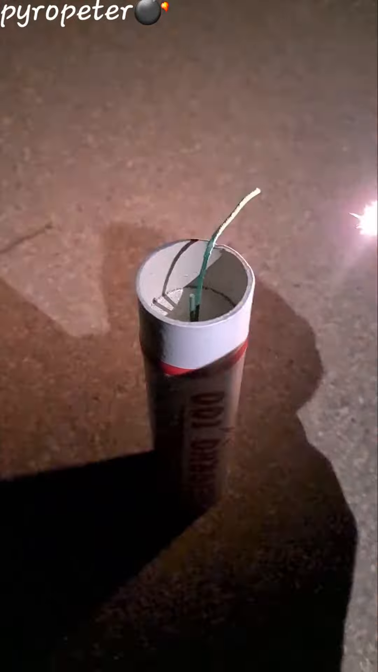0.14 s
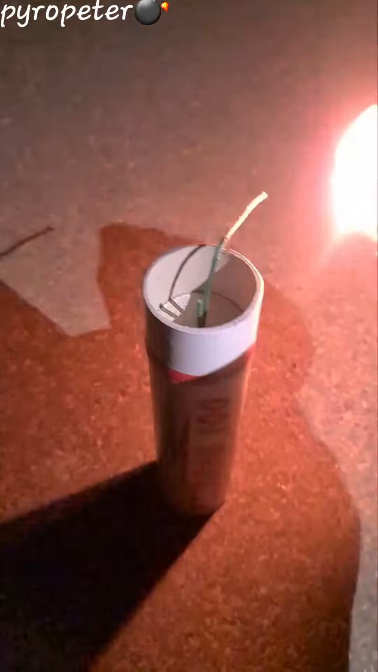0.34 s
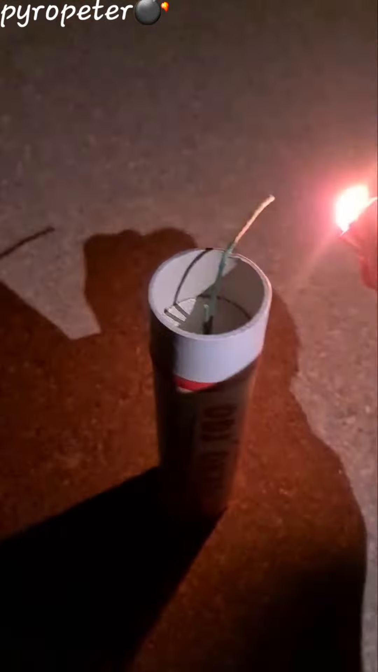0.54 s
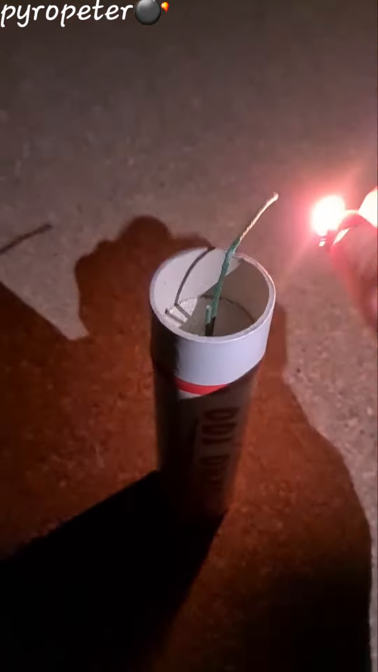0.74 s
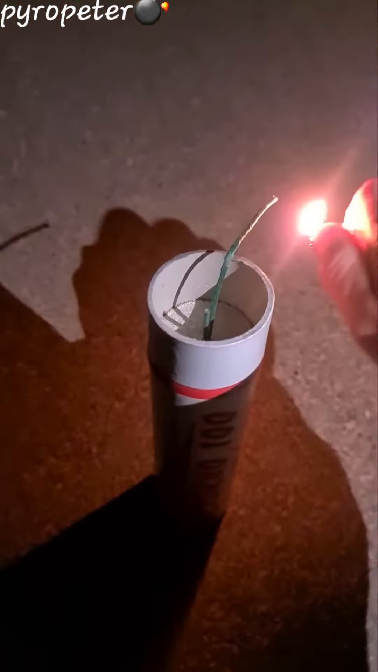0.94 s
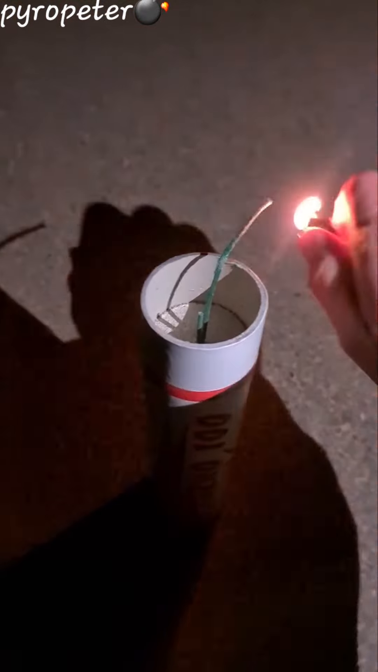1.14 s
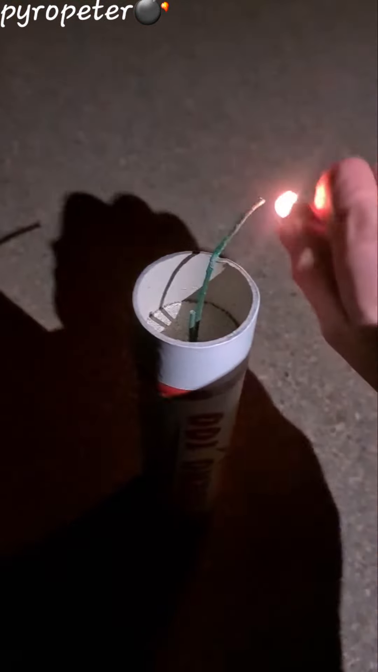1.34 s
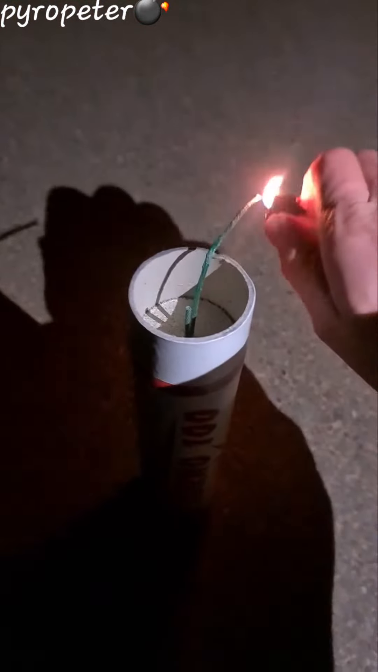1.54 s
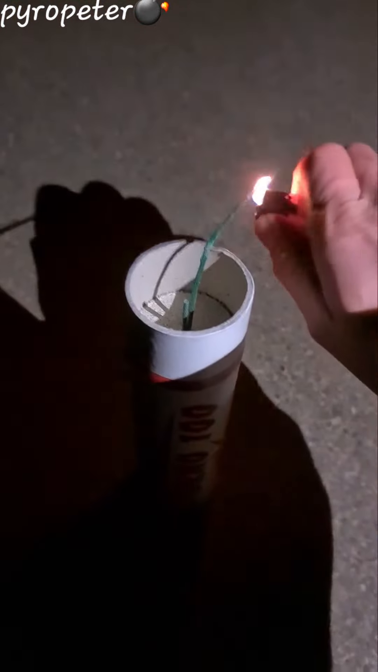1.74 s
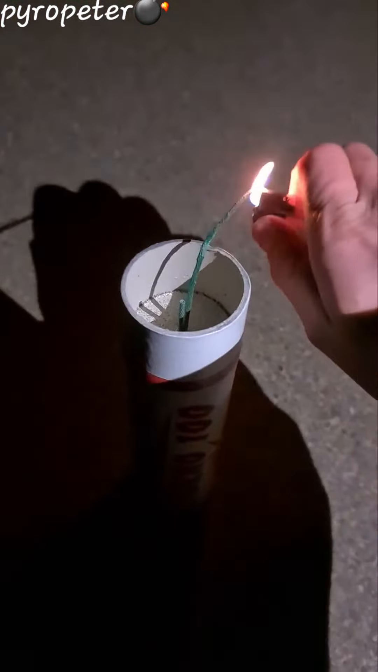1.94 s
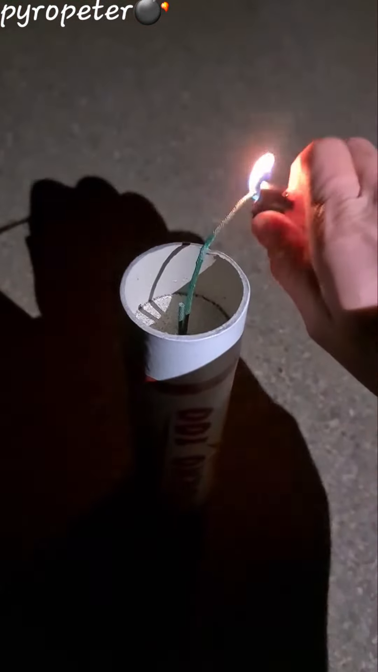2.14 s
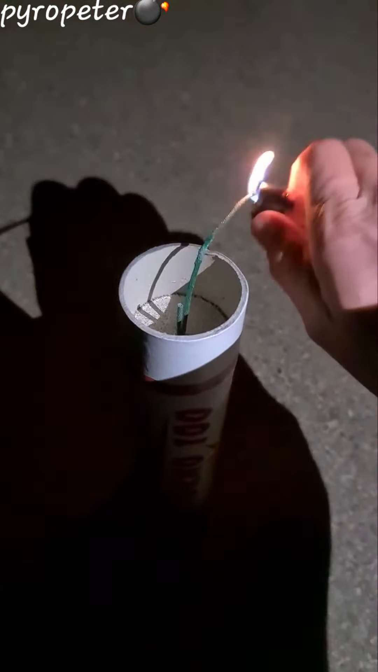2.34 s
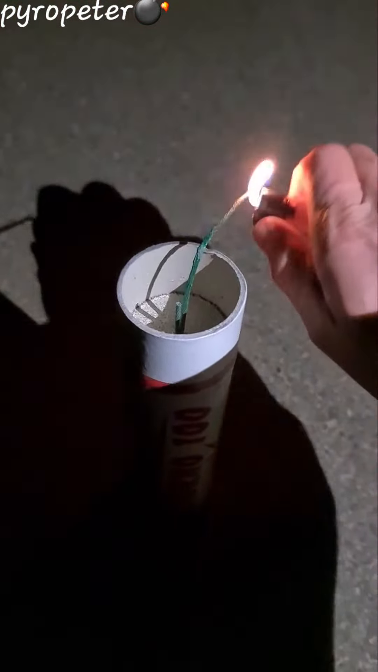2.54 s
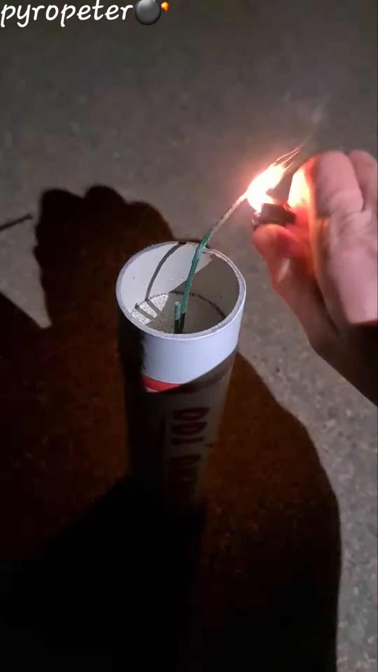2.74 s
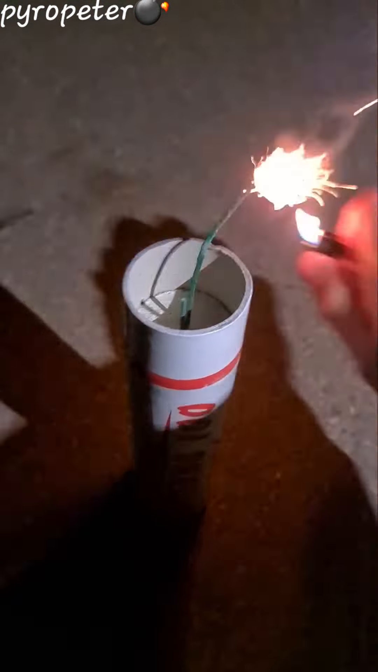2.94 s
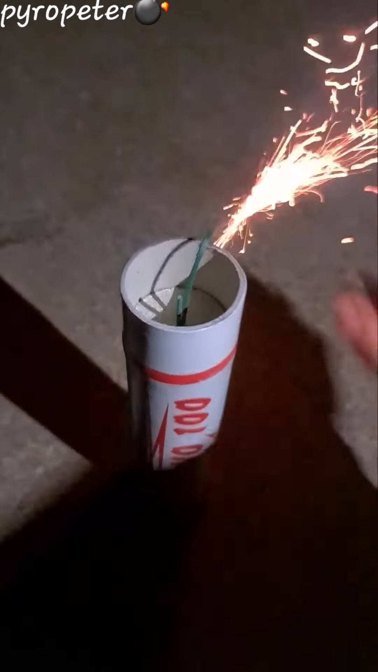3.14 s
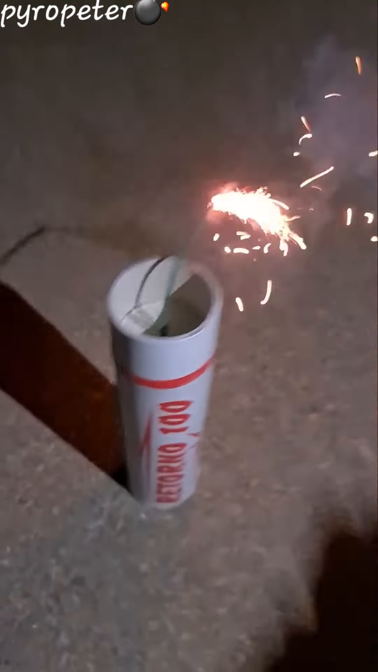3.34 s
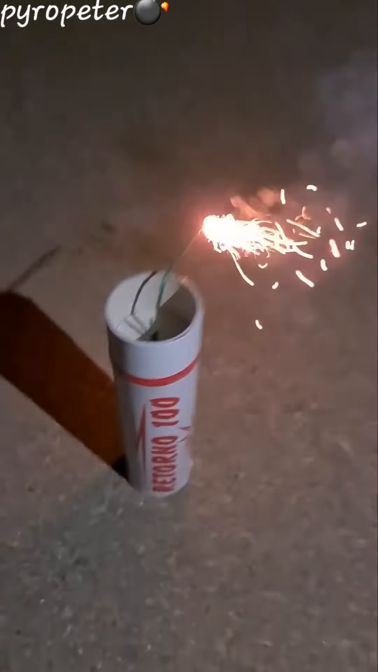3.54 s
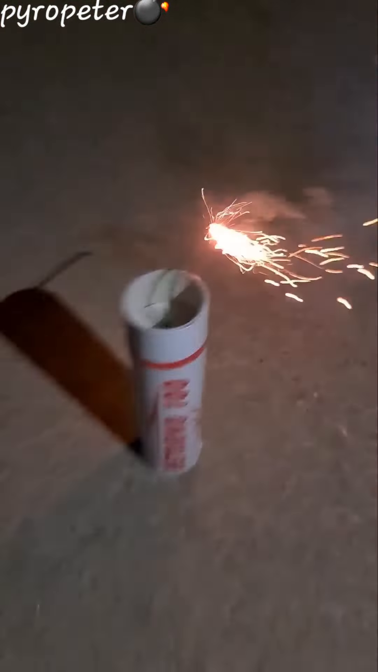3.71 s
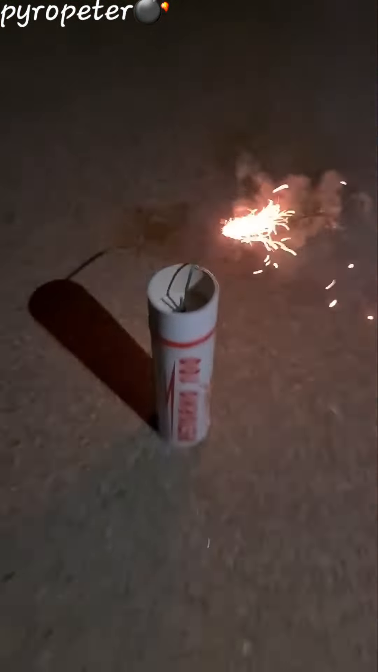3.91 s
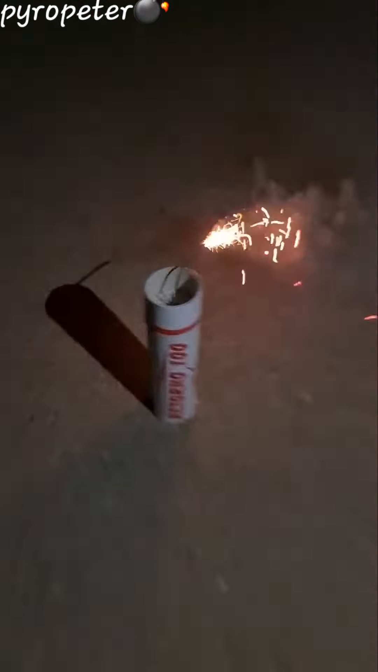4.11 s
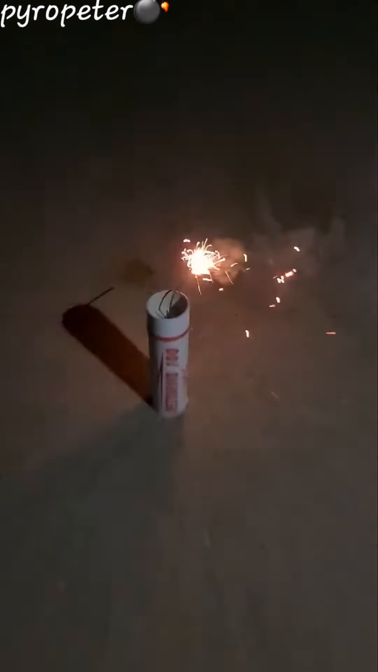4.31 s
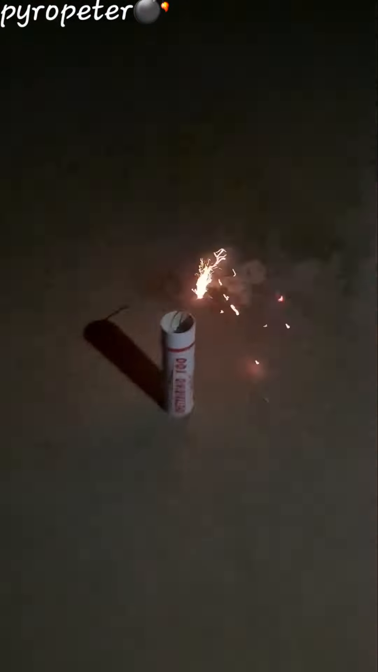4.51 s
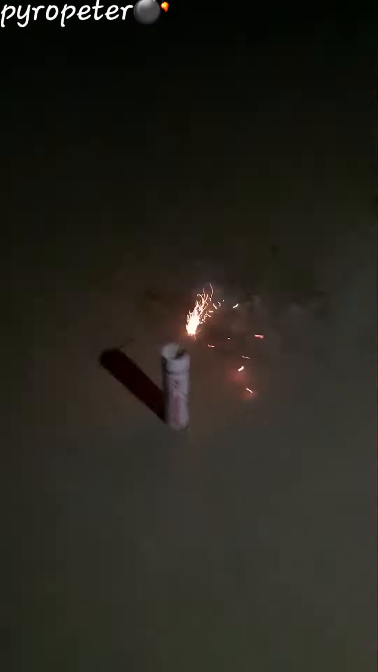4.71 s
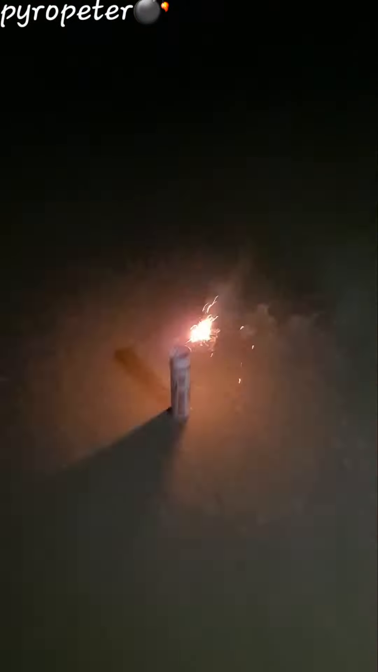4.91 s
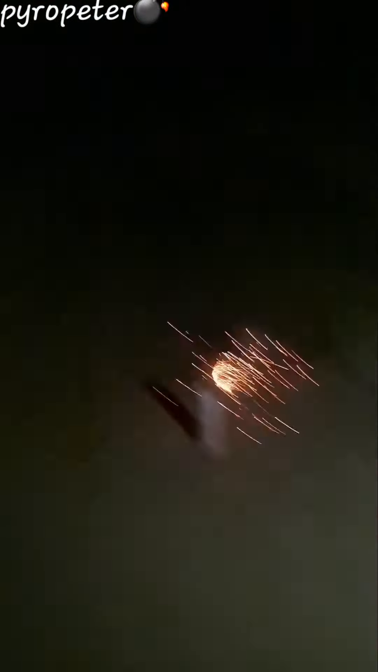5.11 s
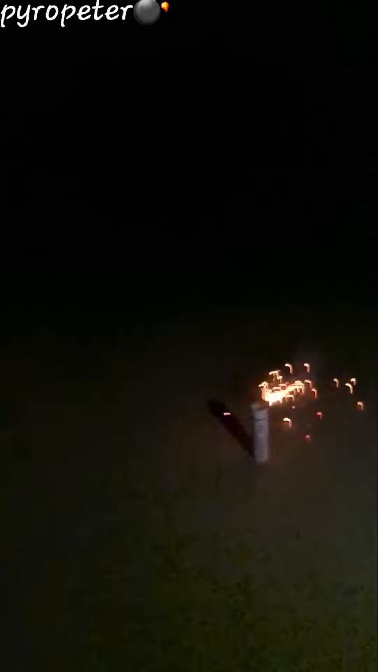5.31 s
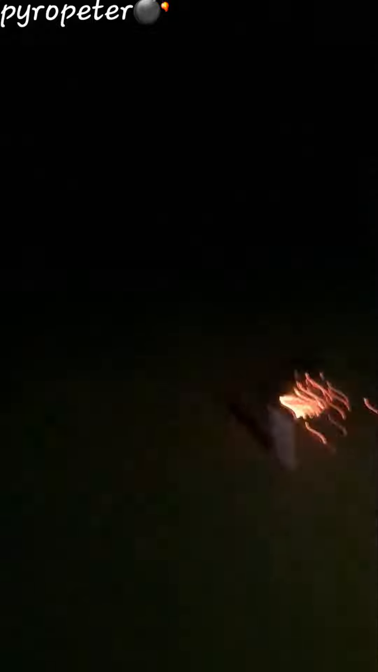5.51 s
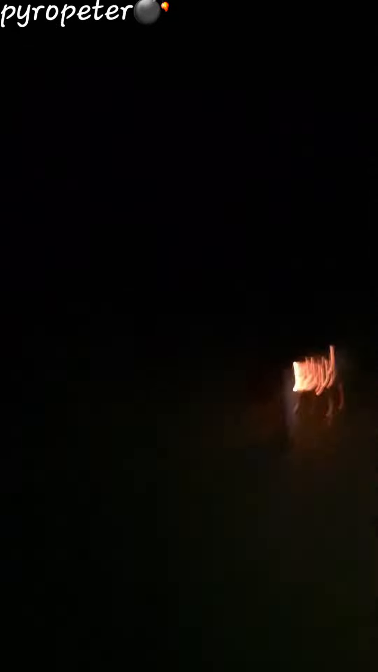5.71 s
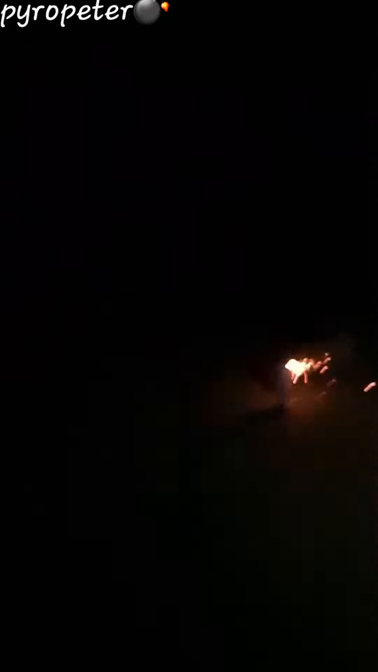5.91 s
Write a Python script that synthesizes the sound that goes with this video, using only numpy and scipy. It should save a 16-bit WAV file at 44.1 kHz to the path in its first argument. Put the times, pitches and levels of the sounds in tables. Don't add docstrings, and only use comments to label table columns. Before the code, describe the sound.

A lighter clicks and rasps in the quiet night, then a fuse spits, catches and burns with a harsh crackling hiss amid handling knocks.

```python
import sys
import numpy as np
from scipy import signal
from scipy.fft import rfft, irfft
from scipy.io import wavfile
from scipy.ndimage import uniform_filter1d, map_coordinates

SR = 44100
rng = np.random.default_rng(int(sys.argv[2]) if len(sys.argv) > 2 else 0)


def put_to_file(sound):
    columns = np.atleast_2d(sound).T
    safe = np.clip(columns, -1, 1)
    whole_steps = np.round(safe * 32767)
    wavfile.write(sys.argv[1], SR, whole_steps.astype(np.int16))


def gain_from_db(level_db):
    decades = np.asarray(level_db, float) / 20
    return 10 ** decades


N = 262953

# time_s, edge_hz
GAP = [(0, 9760), (1, 10200), (2, 10860), (3, 11560), (4, 12370), (5, 12830), (5.96, 13150)]


def rms_one(x):
    return x / np.sqrt(np.mean(x ** 2) + 1e-20)


def in_time(rows):
    s, *columns = np.transpose(rows)
    return [np.interp(np.arange(N) / SR, s, c) for c in columns]


def drift(rate_hz):
    r = np.exp(-80 * np.pi * rate_hz / SR)
    slow = signal.lfilter([1], [1, -2 * r, r * r], rng.standard_normal(N // 40 + 2002))[2000:]
    return np.interp(np.arange(N) / 40, np.arange(len(slow)), rms_one(slow))


def coloured(spectrum):
    hz, db = np.transpose(spectrum)
    bins_hz = np.arange(1, N // 2 + 2) * SR / N
    gain = gain_from_db(np.interp(np.log(bins_hz), np.log(hz), db))
    return rms_one(irfft(rfft(rng.standard_normal(N)) * gain, N))


def band(x, hz, octaves):
    edges = np.clip(hz * 2 ** (np.array([-.5, .5]) * octaves), 20, .45 * SR)
    return signal.sosfilt(signal.butter(2, edges, "band", fs=SR, output="sos"), x)


def add(out, s, sound):
    at = max(round(s * SR), 0)
    out[at:at + len(sound)] += sound[:N - at]


def resonances(drive, modes, flutter_db, rate, order=1, bend=1):
    out = 0
    for k, (hz, width, db) in enumerate(modes):
        r = np.exp(-np.pi * width / SR)
        section = [(1 - r * r) / 2, 0, (r * r - 1) / 2, 1, -2 * r * np.cos(2 * np.pi * hz / SR), r * r]
        swell = gain_from_db(db + flutter_db * (drift(rate) + 0.2 * drift(2)))
        out = out + (-1) ** k * swell * signal.sosfilt([section, section], drive)
    edge_hz, = in_time(GAP)
    speed = edge_hz / edge_hz[-1]
    return rms_one(map_coordinates(out, [np.cumsum(bend * speed)], order=order))


def fuse():
    # pitch_hz at full speed, width_hz, level_db
    roar_modes = [(602, 230, -7), (787, 300, -2.5), (900, 303, -3), (1075, 420, -10.5), (420, 265, -17.5),
                  (1425, 300, -16)]
    throat_modes = [(1790, 124, 1.5), (1976, 160, 3), (2200, 250, 1), (2380, 160, 0), (2707, 140, 2.5)]
    jet_modes = [(2800, 380, 2.5), (3375, 530, -2.5), (4900, 180, -10), (5370, 190, -2.5), (6040, 360, -6),
                 (7200, 340, -34)]
    whine_modes = [(4115, 420, 0)]
    spray_modes = [(8150, 4500, -8), (8500, 240, 7), (9150, 3750, 3), (10480, 690, -0.5),
                   (10530, 1700, 1.5), (11230, 3900, -2), (12490, 450, 6), (16350, 1500, -1.5)]
    # time_s, share (0-1)
    blurring = [(2.84, 0.4), (3.1, 0.57), (3.25, 0.5), (3.32, 0.7), (3.52, 0.6), (3.62, 0.8), (3.95, 0.8),
                (4.05, 0.2), (4.35, 0.48), (4.55, 0.86), (4.68, 0.87), (4.85, 0.8), (5.1, 1), (5.96, 1)]
    # time_s, level_db over the vigour
    whining = [(2.9, -3), (3.0, -5), (3.14, -5), (3.26, -18), (3.33, -8), (3.42, -4.5), (3.47, -10),
               (3.54, -8), (3.64, -13), (3.85, -14), (4.0, -6), (4.12, -12.5), (4.23, -7), (4.4, -3.5),
               (4.53, -9.5), (4.66, -28), (4.76, -9), (4.85, -24), (5.96, -13)]
    # time_s, pitch_ratio
    narrowing = [(0, 1.025), (3.3, 1.01), (3.9, 1.01), (4.25, 1.01), (4.55, 1.055), (4.85, 1.06),
                 (5.96, 1.06)]

    vigour, choke_db, aim_db, flame_db = burning()
    jet_db = -1.5 + 0.33 * choke_db + aim_db
    throat_db = -14 + choke_db
    roar_db = 0.53 * choke_db + flame_db

    grain_size = gain_from_db(4.8 * np.minimum(rng.exponential(1, N), 3.6))
    grains = (rng.random(N) < 900 / SR) * grain_size * rng.choice([-1, 1], N)
    turbulence = gain_from_db(0.28 * drift(33) + 0.34 * drift(220))
    gas = (rng.standard_normal(N) + 0.2 * rms_one(grains)) * turbulence

    roar = gain_from_db(roar_db) * resonances(gas, roar_modes, flutter_db=2.6, rate=24)
    throat = gain_from_db(throat_db) * resonances(gas, throat_modes, flutter_db=2.2, rate=20)

    blur = np.clip(in_time(blurring)[0], 0, 1)
    wash = rms_one(band(gas[::-1], 2420, 1.81)) * gain_from_db(0.29 * drift(51))
    clear_jet = resonances(gas, jet_modes, flutter_db=2.2, rate=16, order=3)
    jet = gain_from_db(jet_db + 1.05) * (np.sqrt(1 - blur) * clear_jet + np.sqrt(blur) * wash)
    whine = resonances(gas, whine_modes, flutter_db=1.5, rate=20, order=3, bend=in_time(narrowing)[0])
    jet = jet + gain_from_db(in_time(whining)[0]) * whine
    spray = gain_from_db(-0.27) * resonances(gas, spray_modes, flutter_db=1.7, rate=17, order=3)

    lag = SR * (.00145 + 0.00013 * drift(1.78))
    echo = np.interp(np.arange(N) - lag, np.arange(N), spray + jet)
    heard = roar + throat + 0.73 * (jet + spray + 0.37 * echo)
    close = np.clip((3.8 - np.arange(N) / SR) / .3, 0, 1)
    return vigour * (heard - .85 * close * band(heard, 1380, .34))


def burning():
    # time_s, vigour_db, choke_db by the sheath, aim_db of the jet at the microphone
    burn = [(3.115, -46.5, 5, -1.5), (3.155, -43.5, 3.5, -4.5), (3.19, -35, -1.5, -4),
            (3.235, -34.5, -2, -13), (3.275, -35, 5.5, -5), (3.315, -29.5, 2.5, -6), (3.36, -32.5, 2.5, -5),
            (3.6, -35, -0.5, -5), (3.7, -36, 3.5, -4), (3.88, -34.5, 0, -2.5), (4.08, -36.5, -1, -7.5),
            (4.28, -36, -3, -0.5), (4.55, -37.5, -8, -2.5), (4.95, -41.5, -1.5, 0),
            (5.2, -41.5, -14.5, 2.5), (5.4, -43, 3.5, -3), (5.68, -45, -1, -2), (5.96, -44.5, -15, 6.5)]
    # start_s, length_s, level_db, choke_db
    spurts = [
        (2.89, 0.027, -66, -2),
        (2.908, 0.097, -50, 3.5),
        (2.986, 0.021, -55, 4),
        (3.017, 0.0096, -54, -14),
        (3.037, 0.02, -55, 9),
        (3.088, 0.018, -55.5, -7),
    ]
    # time_s, level_db
    flame_size = [(2.9, -12), (3.15, -16), (3.24, -10.5), (3.33, -11.5), (3.5, -10), (3.7, -9), (3.9, -4),
                  (4.0, -6), (4.2, -4), (4.37, -2), (4.5, -2), (4.58, -3.5), (4.66, -0.5), (4.8, -1.5),
                  (4.95, -5), (5.2, -3.5), (5.5, -5.5), (5.96, -11)]
    rise_s, fall_s = .003, .004

    t = np.arange(N) / SR
    vigour_db, choke_db, aim_db = in_time(burn)
    choke_db = choke_db + 9 * np.exp(-np.maximum(t - 3.1, 0) / 0.97)
    vigour = gain_from_db(vigour_db) * np.exp(np.minimum(t - burn[0][0], 0) / rise_s)
    for s, length, db, extra_db in spurts:
        rise = np.minimum(t - s, 0) / rise_s
        fall = np.maximum(t - s - length, 0) / fall_s
        spurt = gain_from_db(db) * np.exp(rise - fall)
        choke_db = choke_db + extra_db * spurt / (spurt + vigour + 1e-9)
        vigour = vigour + spurt
    return vigour, choke_db, aim_db, in_time(flame_size)[0]


def bursts():
    # pitch_hz, width_octaves, level_db
    lighter = [(540, 1.1, -13), (1150, 0.32, -15), (1960, 0.6, -1.5), (2940, 0.24, -0.5), (4840, 0.2, -6),
               (5400, 1.2, -5.5), (6800, 0.29, -4), (8200, 0.13, -7.5), (12600, 1.1, -9)]
    spring = [(1770, 0.19, -10), (2670, 0.16, 0.5), (3100, 0.11, -18), (4500, 0.036, -10),
              (5200, 0.054, -15), (8080, .2, -8.5), (2200, 2, -2.5)]
    flame = [(1754, 0.087, 1.5), (2140, 0.034, -6), (2420, 0.048, -10), (3520, 0.12, -4), (4820, .15, -6),
             (7500, 0.28, 1.5), (9300, 0.098, 2.5), (9460, 0.03, -3)]
    sole = [(60, 3.9, -3), (760, 1.27, 2.5), (2670, 1.13, -1), (4700, 2, -1.5), (9340, 0.49, 2.5)]
    pebble = [(53.4, 2.5, -12), (433, 0.48, 1), (850, 0.56, 4), (1980, 1.5, -16), (5000, 3.5, -19.5)]
    # top_s, rms_db, rise_s, fall_s, brightness_db per octave
    wheel_strokes = [
        (.452, -56, 0.013, 0.019, -7),
        (.546, -44, .004, 0.0066, -1.5),
        (.557, -29.5, 0.0023, 0.009, 3),
        (.5665, -22, 0.0062, 0.0025, 1),
        (.5735, -28.5, 0.002, 0.0047, -0.5),
        (.585, -46.5, .006, 0.018, 3.5),
        (.665, -56.5, 0.002, 0.017, 4.5),
    ]
    spring_strokes = [(.494, -48, .01, 0.01, 0), (.504, -42.5, 0.0024, 0.02, 1),
                      (.516, -45, .004, .012, -2), (.529, -44, .005, 0.0074, 0)]
    flame_strokes = [
        (3.316, -33, 0.022, 0.032, 1),
        (3.38, -38.5, 0.017, 0.035, 1),
        (3.46, -44, .04, 0.083, -1.5),
    ]
    sole_strokes = [
        (5.262, -33, 0.0017, 0.0077, 0),
        (5.2665, -22, 0.001, 0.006, 0.83),
        (5.276, -27, 0.0073, 0.014, 0),
        (5.292, -31.5, 0.011, 0.027, 0.94),
    ]
    pebble_strokes = [
        (5.715, -32, 0.0027, 0.013, 0.5),
        (5.742, -24, 0.011, 0.011, 2.84),
        (5.769, -42, 0.0059, 0.004, 2),
        (5.921, -34.5, 0.0055, 0.01, 6.9),
    ]
    # top_s, rms_db, pitch_hz, length_s
    brushes = [(0.647, -42.5, 282, 0.0198), (1.096, -63, 1100, 0.1), (1.845, -61, 576, 0.045),
               (3.283, -42, 287, 0.13), (3.315, -28, 5000, 0.036), (5.08, -33.5, 44.6, 0.021),
               (5.293, -35, 43.7, 0.22), (5.432, -29, 315, 0.02), (5.436, -37.5, 2020, 0.019),
               (5.929, -35, 520, 0.059), (2.949, -57.5, 220, 0.032), (3.14, -63, 161, 0.03),
               (4.912, -40, 155, 0.036), (5.517, -39, 40, 0.026), (5.898, -40.5, 131, 0.069),
               (1.765, -70, 170, 0.025), (1.799, -66, 2800, 0.017), (3.183, -51, 118, .03),
               (3.901, -42.5, 890, 0.046), (5.738, -31, 44.5, 0.029)]
    spits = [(5.561, -37.5, 8500, 0.014), (5.835, -35, 9150, 0.02), (5.87, -40, 8600, .0074)]
    whistles = [(5.701, -43, 12450, 0.023), (5.81, -52, 12600, .02)]

    rows = []
    for strokes, body in ((wheel_strokes, lighter), (spring_strokes, spring),
                          (flame_strokes, flame), (sole_strokes, sole)):
        for s, db, rise, fall, tilt_db in strokes:
            for hz, octaves, part_db in body:
                rows.append((s, db + part_db + tilt_db * np.log2(hz / 3000), hz, octaves, rise, fall))
    for s, db, rise, fall, tilt_db in pebble_strokes:
        for hz, octaves, part_db in pebble:
            level_db = db + part_db + tilt_db * np.log2(hz / 900)
            rows.append((s, level_db, hz * 2 ** (tilt_db / 8), octaves, rise, fall))
    rows += [(s, db, hz, 2.05, length, length) for s, db, hz, length in brushes]
    rows += [(s, db, hz, 0.028, length, length) for s, db, hz, length in whistles]
    rows += [(s, db, hz, 0.56, 0.002, length) for s, db, hz, length in spits]

    out = np.zeros(N)
    for s, db, hz, octaves, rise, fall in rows:
        before, after = (4000, 8000) if max(rise, fall) > .02 else (2500, 4500)
        t = np.arange(-before, after) / SR
        hiss, lumps = rng.standard_normal((2, len(t)))
        grit = hiss * gain_from_db(1.4 * rms_one(uniform_filter1d(lumps, size=60)))
        shape = np.exp(np.where(t < 0, t / rise, -t / fall))
        rub = rms_one(band(band(grit, hz, octaves), hz, 4.4 * octaves))
        add(out, s + t[0], gain_from_db(db) * shape * rub)
    return out


def ticks():
    # time_s, peak_db, pitch_hz
    taps = [
        (.734, -40, 6860),
        (1.676, -39, 2010),
        (5.126, -18.5, 1560),
    ]
    snaps = [(.662, -26, 7000), (.7205, -26, 11000), (1.469, -45, 1620), (4.989, -20.5, 3500),
             (5.045, -26, 1940), (5.213, -22, 2960), (5.2655, -20, 6000), (5.6256, -16, 2200),
             (5.919, -30, 2800)]
    pops = [(2.8605, -45, 4080), (2.8672, -27, 4100), (2.893, -50, 2800), (3.022, -32, 4000),
            (3.0365, -28, 2800), (3.0769, -36, 2500), (3.1155, -49, 3500), (.369, -33, 10000),
            (1.1345, -38, 1800)]
    clicks = [(.518, -23, 3700), (.618, -28, 1900), (.662, -38, 3000), (.7215, -26, 8500),
              (.911, -41, 3400), (1.678, -44, 6500), (1.72, -47, 7500), (5.545, -25, 1300),
              (1.602, -32, 2240), (1.809, -30.5, 2170), (1.8215, -32.5, 2550), (1.908, -37.5, 2000),
              (4.173, -17, 2200), (5.4355, -23, 2550)]
    chinks = [(.3765, -38, 744), (.7215, -36, 3720), (.722, -31, 13400), (.505, -34, 8100),
              (2.044, -46, 3100), (2.046, -51, 1500), (5.57, -28, 4200), (5.575, -31, 3200),
              (5.656, -27, 4080), (5.658, -32, 2110), (5.8, -30, 1150), (.584, -26, 7200),
              (.5035, -22, 2670), (.5658, -8, 1960), (.572, -19, 1890), (1.603, -37.5, 660),
              (1.606, -45, 1150), (1.752, -43.5, 1600), (1.811, -40, 800), (1.812, -42, 1270),
              (1.909, -40, 760), (5.559, -25, 2200), (5.56, -26, 3200), (5.626, -19, 1200),
              (5.628, -27, 4900), (5.7445, -15, 1790), (5.745, -23, 2300), (5.731, -24, 1900),
              (5.865, -26, 1600), (5.9195, -9.5, 1140), (5.921, -22, 3660), (5.924, -25, 1920),
              (5.944, -24, 696)]
    # table, time to fall 60 dB (s), width (octaves), level of the dull body (dB)
    kinds = ((taps, 0.081, 0.63, 2.5), (snaps, 0.0074, 1.4, 2.5), (pops, 0.02, 2, -30),
             (clicks, .02, 1.5, -25), (chinks, 0.011, 0.36, -28))

    out, t = np.zeros(N), np.arange(1300) / SR
    for rows, t60, octaves, body_db in kinds:
        for s, db, hz in rows:
            snap = rng.standard_normal(len(t)) * gain_from_db(-60 * t / t60) * (1 - np.exp(-t / 0.000099))
            snap[0] = 3.5
            crack = band(snap, hz, octaves) + gain_from_db(body_db) * band(snap, hz / 2.1, 0.55)
            add(out, s, gain_from_db(db - 9.0) * crack / np.abs(crack).max())
    return out


def knocks():
    # time_s, peak_db, pitch_hz
    grip_knocks = [(.019, -46, 350), (.088, -44, 250), (.121, -28, 370), (.223, -40, 282),
                   (.2773, -25, 440), (.505, -40, 362), (.634, -42, 234), (.705, -40.5, 365),
                   (1.834, -46, 500), (1.841, -46, 350), (1.851, -46, 206), (3.608, -28, 350),
                   (3.689, -14.5, 293), (3.799, -37, 132), (4.645, -31, 184), (5.188, -21, 253),
                   (5.266, -15.5, 94.5), (5.2885, -17.5, 100), (5.378, -24.5, 155)]
    walk_knocks = [(1.676, -42.5, 417), (3.889, -31, 526), (3.981, -29, 207), (4.197, -27, 620),
                   (4.35, -33.5, 242), (4.472, -28.5, 292), (4.507, -28.5, 272), (4.587, -24, 261),
                   (4.989, -35, 258), (5.144, -21.5, 217), (5.164, -26, 367), (5.227, -26.5, 247),
                   (5.4232, -18, 268), (5.4362, -12.5, 468), (5.893, -26.5, 505)]
    more_walk_knocks = [(4.597, -36.5, 300), (4.658, -38, 420), (4.663, -38, 250), (4.732, -28.5, 805),
                        (4.751, -37, 280), (4.784, -39, 230), (4.826, -35, 380), (4.878, -27, 226),
                        (4.893, -36, 260), (4.518, -38, 300), (4.362, -38, 330), (4.379, -30, 620),
                        (5.4103, -26, 300), (5.417, -22.5, 256), (5.4304, -21, 245), (5.441, -25, 400),
                        (5.49, -37, 700), (4.677, -35, 160), (5.463, -32, 850)]
    pull_knocks = [(4.727, -17, 215), (4.867, -23.5, 337), (4.807, -28, 310)]
    prods = [
        (.3768, -32, 282),
        (.4275, -36.5, 300),
        (5.257, -18, 297),
    ]
    slips = [(5.7115, -34, 880), (5.7142, -30, 900), (5.72, -29, 850), (5.7262, -24, 1130),
             (5.729, -18, 990), (5.733, -15, 800), (5.7373, -11, 760), (5.7415, -12.5, 850),
             (5.7438, -11, 1120), (5.748, -17.5, 980), (5.7545, -26, 890), (5.7645, -24, 800),
             (5.769, -31, 1000)]
    # table, swings until 60 dB down, direction of the first push
    kinds = ((grip_knocks, 2.33, -1), (walk_knocks + more_walk_knocks, 6.3, -1), (pull_knocks, 6.3, 1),
             (prods, 2.33, 1), (slips, 7.8, -1))

    out, t = np.zeros(N), np.arange(2200) / SR
    for rows, cycles, sign in kinds:
        for s, db, hz in rows:
            sag = np.sin(2 * np.pi * hz * t * (1 - 3.6 * t))
            swing = sag * gain_from_db(-60 * t * hz / cycles) * (1 - np.exp(-t / 0.00095))
            add(out, s, sign * gain_from_db(db + 2.0) * swing / np.abs(swing).max())
    return signal.sosfilt(signal.butter(2, 70, "high", fs=SR, output="sos"), out)


def engine():
    # time_s, level_db
    idle = [(0, -57), (1, -55), (3, -55), (3.7, -55.5), (4.2, -55.5), (4.7, -52), (5.05, -49.5),
            (5.3, -45.5), (5.55, -49.5), (5.75, -51.5), (5.96, -55)]
    # multiple, level_db
    orders = [(1, -15), (2, 2), (3, 5), (4, -8), (5, -19), (6, -24), (7, -15.5), (8, -28), (9, -20),
              (10, -23.5)]
    # time_s, rate_hz
    firing = [(0, 15.351), (1, 15.906), (2, 17.069), (3, 18.315), (4, 19.502), (5, 20.474), (5.96, 20.725)]

    idle_db, = in_time(idle)
    turn = 2 * np.pi * (-.885 + np.cumsum(in_time(firing)[0]) / SR)
    strength_db = idle_db + 1.6 * drift(57)
    puffs = sum(gain_from_db(db + 1.5 * drift(3)) * np.cos(k * turn + .15 * drift(3)) for k, db in orders)
    return np.sqrt(2) * gain_from_db(strength_db) * puffs


def night():
    # time_s, rustle_db
    rustling = [(0, -52.5), (.21, -53.5), (.56, -50), (.76, -56.5), (1.39, -62.5), (1.78, -62.5),
                (2.12, -62), (2.99, -64), (3.2, -61), (3.35, -42.5), (4.23, -43.5), (4.57, -44.5),
                (4.75, -42), (4.95, -52), (5.16, -40.5), (5.5, -44.5), (5.96, -47.5)]
    # pitch_hz, level_db per Hz
    rustle_spectrum = [(60, 9.5), (100, -0.5), (360, -1.5), (700, -6), (1000, -12), (1400, -9), (4500, -21),
                       (7400, -17.5), (14800, -31.5)]
    hiss_spectrum = [(180, -10), (300, -2), (600, -3.5), (1000, -2.5), (1300, -36), (1660, -15),
                     (2340, -5.5), (4000, -8), (4700, -16.5), (6500, -9.5), (10800, -14.5), (14800, -11.5)]

    rustle_db, = in_time(rustling)
    wind_db = -58.5 + 0.079 * (rustle_db + 52)
    wind = rms_one(band(rng.standard_normal(N), 33.0, 2.75)) * gain_from_db(wind_db + 0.46 * drift(2.4))
    rustle = coloured(rustle_spectrum) * gain_from_db(rustle_db + 2.5 + 1.55 * drift(26))
    valve_open = np.exp(-((np.arange(N) / SR - 2.16) / 0.14) ** 2)
    whistle = rms_one(band(rng.standard_normal(N), 1600, 0.13))
    valve = gain_from_db(-71 + 3 * drift(11)) * valve_open * whistle
    hiss = coloured(hiss_spectrum) * gain_from_db(-67 + 0.31 * drift(6.8))
    return valve + wind + rustle + hiss


def scene():
    return np.tile(engine() + night() + fuse() + knocks() + ticks() + bursts(), (2, 1))


def band_limit(x):
    return signal.sosfilt(signal.butter(12, 15310, fs=SR, output="sos"), x)


def record(dry):
    # start_s, end_s, low_hz, high_hz, share of empty cells (0-1)
    starved = [(.4, 2.88, 11600, 14700, .06), (1.8, 2.88, 9000, 11400, .06), (2.8, 3.17, 9900, 11500, .45),
               (2.88, 3.12, 13600, 14700, .7), (3.12, 3.75, 14500, 14700, .6),
               (3.12, 3.42, 13600, 14130, .9), (3.593, 3.617, 13600, 14700, 1), (3.3, 3.8, 4800, 6600, .08),
               (3.98, 4.27, 4800, 7200, .35), (4.3, 4.45, 6000, 7200, .15), (4.7, 4.95, 5000, 6900, .45),
               (5.0, 5.25, 5300, 6500, .15), (5.38, 5.96, 5000, 7200, .25)]

    rounded = np.tanh(dry[0] / 0.91) * 0.89
    hz, s, cells = signal.stft(rounded, SR, "blackman", nperseg=1024, noverlap=768)
    hz, edge = hz[:, None], np.interp(s, *np.transpose(GAP))
    kept = (hz < edge) | (hz > 1.188 * edge) & (hz < 14660) & (s < 3.73)
    streaks = uniform_filter1d(rng.standard_normal(cells.shape), size=3, axis=0)
    streaks = uniform_filter1d(streaks, size=14, axis=1)
    for start, end, low, high, share in starved:
        patch = (s > start) & (s < end) & (hz > low) & (hz < high)
        kept &= ~(patch & (streaks < np.quantile(streaks[::8, ::4], share)))
    mono = signal.istft(cells * kept, SR, "blackman", nperseg=1024, noverlap=768)[1][:N]
    return band_limit(np.tile(mono, (2, 1)))


dry = scene()
out = record(dry)
put_to_file(out)
```